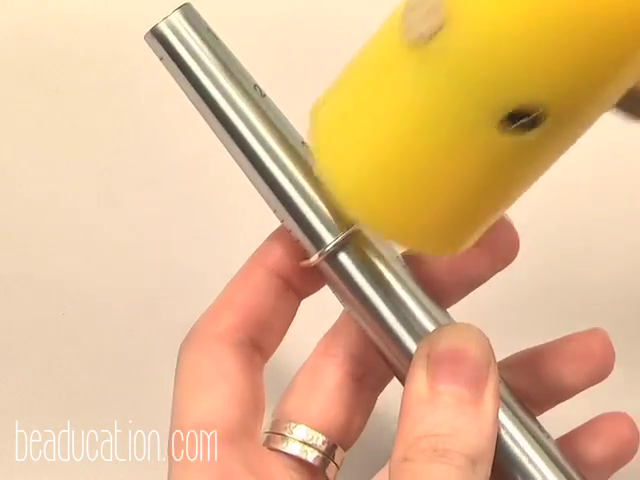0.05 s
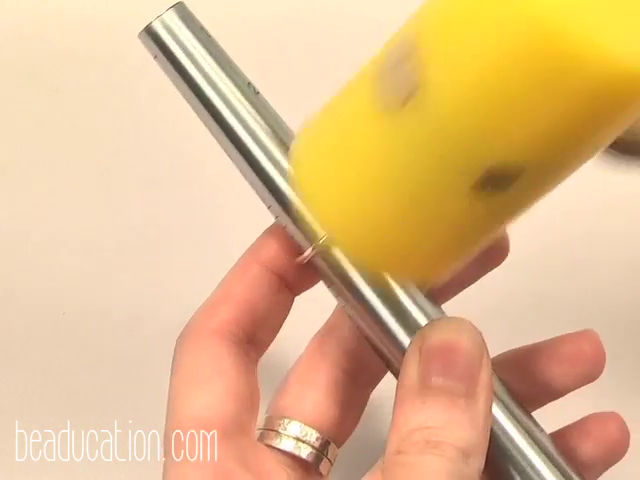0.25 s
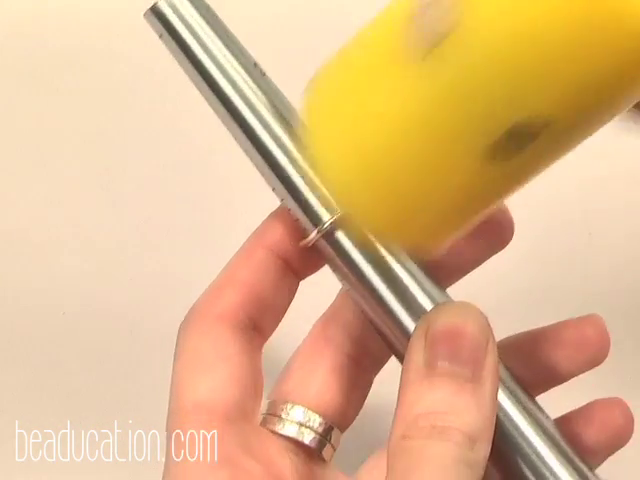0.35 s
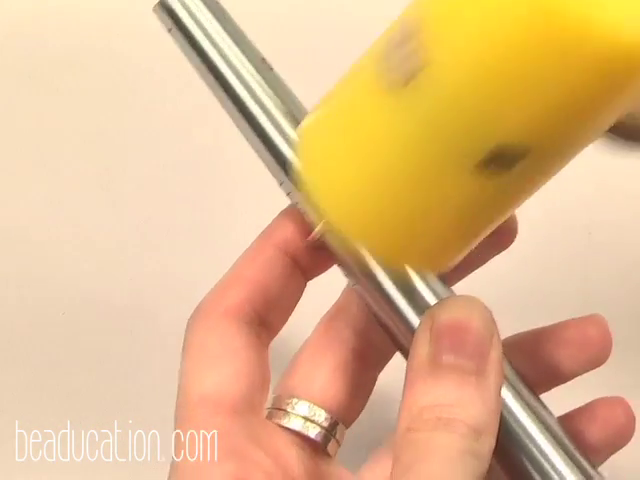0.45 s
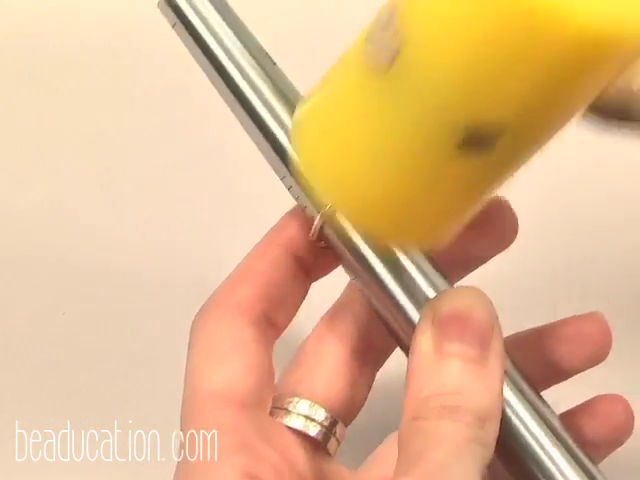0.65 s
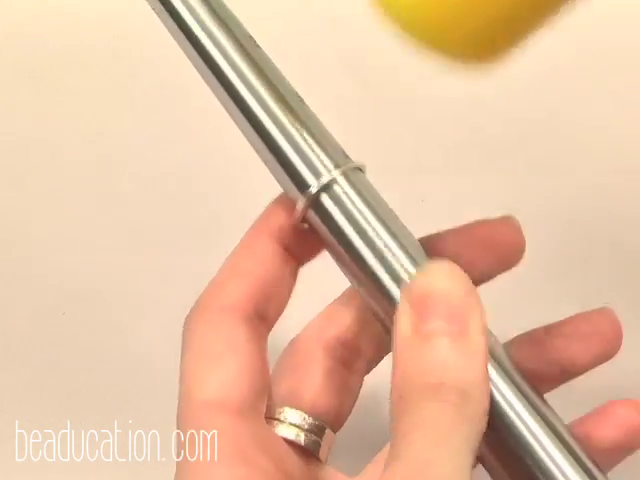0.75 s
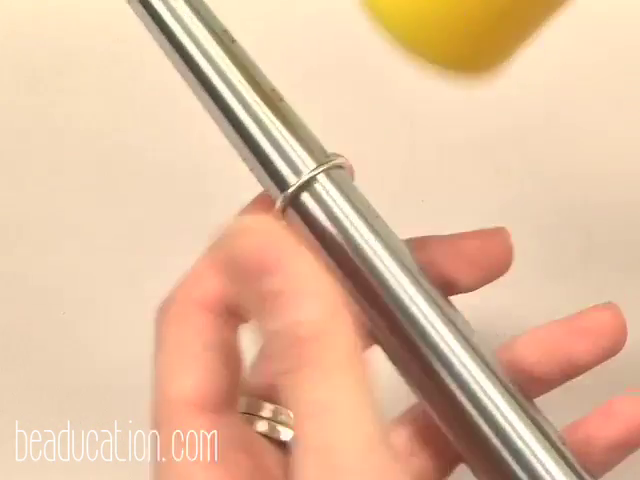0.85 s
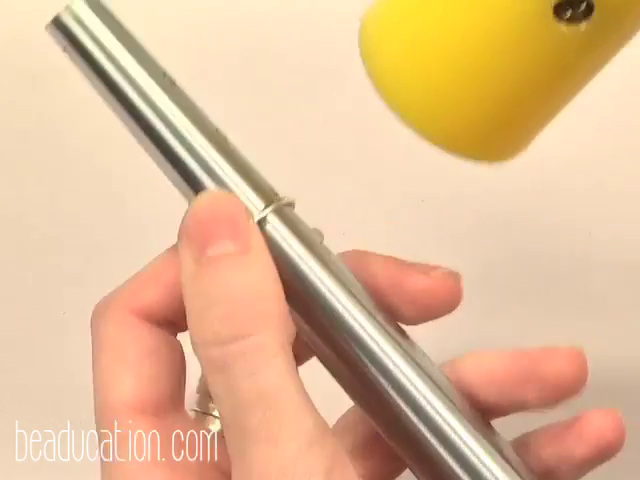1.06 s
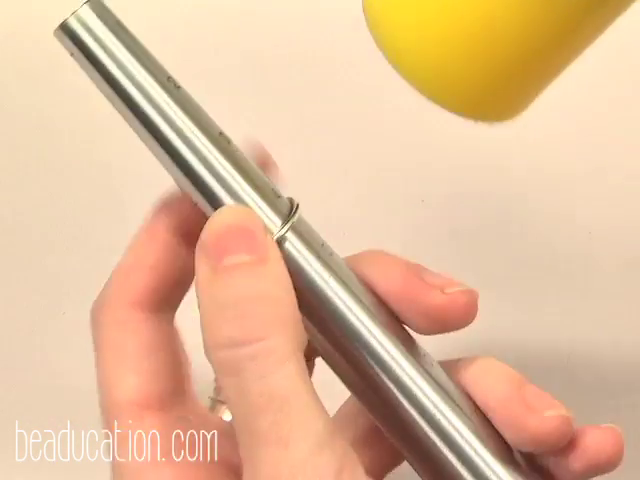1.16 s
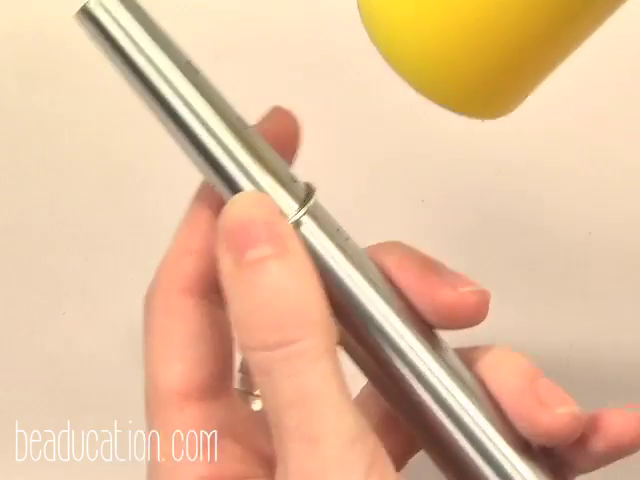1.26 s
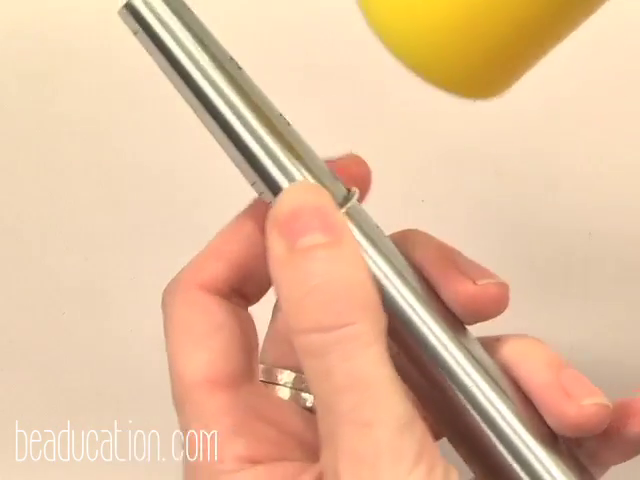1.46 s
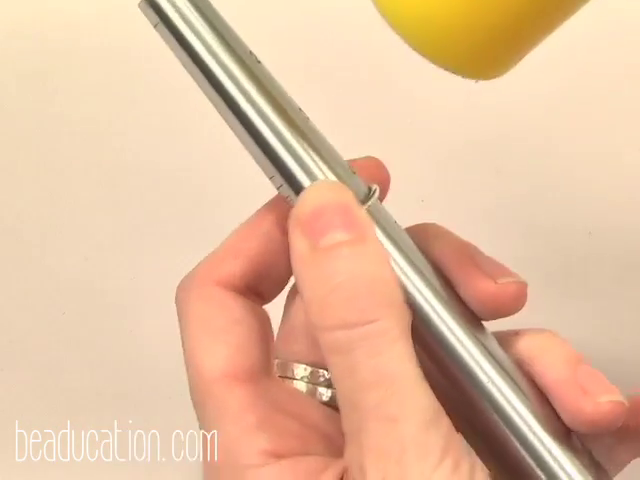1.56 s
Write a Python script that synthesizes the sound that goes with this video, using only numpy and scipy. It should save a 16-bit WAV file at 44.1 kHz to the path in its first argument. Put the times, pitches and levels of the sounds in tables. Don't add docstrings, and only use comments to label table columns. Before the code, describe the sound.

A plastic mallet strikes a metal ring on a hand-held steel bar three times in quick succession, each crack leaving a short bright ring; later a faint tick, over low rumble and hiss, close microphone in a small room.

```python
import sys
import numpy as np
from scipy import signal
from scipy.fft import rfft, irfft, next_fast_len
from scipy.io import wavfile
from scipy.ndimage import uniform_filter1d, map_coordinates

SR = 44100
rng = np.random.default_rng(int(sys.argv[2]) if len(sys.argv) > 2 else 0)


def undo_db(level):
    steps = np.asarray(level, float) / 20
    return 10 ** steps


def output_pcm(signal):
    pcm = np.clip(np.atleast_2d(signal).T, -1, 1) * 32767
    wavfile.write(sys.argv[1], SR, np.round(pcm).astype(np.int16))


N = 70560

# start in seconds, chatter level in dB, contact length in seconds,
# push level in dB, rebound level in dB.
BLOWS = [
    (.21, -3, .0016, -20, -12.5),
    (0.4235, -1.5, 0.001496, -18.5, -12),
    (.614, -3, 0.001238, -3, -3),
    (1.1524, -30, 0.00008, -66.5, -66),
]
# slips per second, fade of the slips in dB per 0.33 ms,
# ring time of the bar against a light grip as a factor, room level in dB.
SKIDS = [(1753, 2, 0.81, -14), (1895, 3, 0.87, -16.5), (3080, 34, 1.27, -17), (4000, 1.1, 1.3, -13.5)]
# pitch in Hz, time to fall 60 dB in seconds.
BAR_MODES = [(985, .27), (2508, 0.12), (4621, 0.14), (7311, 0.065), (10575, 0.084), (14195, 0.12)]
BAR_LEVELS = [(-28, -28, -21.5, -58), (-20.5, -23, -32, -42), (-27, -32.5, -41, -38),
              (-22, -22, -28, -48.5), (-35, -24.5, -29.5, -41), (-51, -34, -40, -62)]
# pitch in Hz, time to fall 60 dB in seconds.
HEAD_MODES = [(1320, 0.025), (1900, 0.0076), (3450, 0.0065), (4180, 0.015), (5130, 0.0082), (5900, 0.014),
              (6900, 0.0083), (11400, 0.0061), (12800, 0.0084)]
HEAD_LEVELS = [(-9, -8.5, -9, -45), (-23.5, -28.5, -23, -64), (-7, -2, -8, -56), (-12.5, -12, -11.5, -56),
               (-17, -12.5, -20, -66), (-16, -29, -16.5, -62), (-7.5, -5, -6.5, -45),
               (-21, -16, -11.5, -35), (-20, -11, -8.5, -45)]
# start in seconds, level in dB, pitch in Hz, time to fall 60 dB in seconds.
TICKS = [(0.0567, -29.5, 296, 0.02), (.061, -36, 756, 0.036), (.15, -33, 1600, 0.0037),
         (0.1685, -15.5, 1650, 0.0029), (0.1742, -36, 3600, 0.0027), (0.2383, -24, 900, 0.0072)]
# frequency in Hz, time to fall 60 dB in seconds.
ROOM_DECAY = [(150, 0.19), (500, 0.4764), (1300, 0.31), (4000, 0.22), (12000, 0.17)]
# frequency in Hz, level in dB.
ROOM_COLOUR = [(100, -6), (500, 2.5), (1400, -1), (3000, -2.5), (6000, -3.5), (9000, -4), (15000, -5.5)]
# frequency in Hz, level in dB per Hz.
RUMBLE_COLOUR = [(8.8, -10), (15, 12), (70, 4), (140, -9), (184, -14.5), (300, -43), (390, -39),
                 (660, -120)]
# frequency in Hz, level in dB per Hz.
HISS_COLOUR = [(120, -7), (200, -2), (979, -12), (1070, -14.5), (1180, -15), (14200, -27.5), (15600, -28),
               (16500, -69)]
DUCK_DB = (3.6, 1.5, 3.5)

LINGER_DB, LINGER_T60_TIMES, LINGER_HZ = -16.5, 1.7, 3.7
BUILD = 2.2
SLIP_SCATTER, SLIP_CUTOFF_HZ = 0.17, 5570
SWELL_S = 0.0004
CHOKE_DB, CHOKE_S = -6.5, 0.00064
PUSH_CUTOFF_HZ, REBOUND_S = 3770, 0.00039
SPRING_HZ, SPRING_WIDTH_HZ, SPRING_DB = 1240, 1500, 0.5
ROOM_LAG_S, BAR_ROOM_DB = 0.004, -4.5
FAR_S = 0.0019
RUSTLE_START_S, RUSTLE_END_S, RUSTLE_DB, RUSTLE_HZ = 0.049, 0.18, -56.5, 900
RUMBLE_DB, HISS_DB = -41.5, -54.5
START_DB, RECOVER_DB_PER_S = 3, 4.5
DIP_DB, DIP_S = 1.5, 0.12
CEILING, TOP_HZ = 0.82, 16100


def taps():
    out = np.zeros(N)
    t = np.arange(SR // 2) / SR
    for blow, skid, shake, reach in zip(BLOWS, SKIDS, np.transpose(HEAD_LEVELS), np.transpose(BAR_LEVELS)):
        start, chatter_db, length, push_db, rebound_db = blow
        rate, fade_db, free, room_db = skid
        struck = undo_db(chatter_db) * slips(length, rate, fade_db, t)
        struck = struck - mallet_head(length, shake, t) + push(length, push_db, rebound_db, t)
        bar = ringing_bar(reach, free, t)
        crack = struck * np.exp(-np.maximum(t - length, 0) / FAR_S)
        answer = undo_db(room_db) * room(crack + undo_db(BAR_ROOM_DB) * bar)
        add(out, start, struck + bar * np.minimum(t / length / BUILD, 1) + answer)
    return out


def slips(length, rate, fade_db, t):
    chance = rng.standard_normal((24, 2))
    k = np.arange(24)
    at = np.abs(k + SLIP_SCATTER * chance[:, 0] * (k > 0)) / rate
    height = -undo_db(0.5 * chance[:, 1] - fade_db * at / 0.00033) * (at <= length)
    clicks = np.bincount((at * SR).astype(int), height, len(t))
    clicks = filtered(clicks, lambda f: 1 / (1 + 1j * f / SLIP_CUTOFF_HZ) ** 3)
    return clicks / np.abs(clicks).max()


def mallet_head(length, shake, t):
    head = sum(ring(hz, db, t60, t) for (hz, t60), db in zip(HEAD_MODES, shake))
    head = head * (1 - np.exp(-t / SWELL_S))
    late = np.maximum(t - length, 0)
    return head * undo_db(CHOKE_DB * (1 - np.exp(-(late / CHOKE_S) ** 2)))


def push(length, push_db, rebound_db, t):
    pressing = -undo_db(push_db) * t / length
    rebound = undo_db(rebound_db) * np.exp(-np.maximum(t - length, 0) / REBOUND_S)

    def spring(f):
        shiver = undo_db(SPRING_DB) * peak(f, SPRING_HZ, SPRING_WIDTH_HZ)
        return 1 / (1 + 1j * f / PUSH_CUTOFF_HZ) ** 2 + shiver

    return filtered(np.where(t < length, pressing, rebound), spring)


def ringing_bar(reach, free, t):
    bar = np.zeros(len(t))
    for (hz, t60), db in zip(BAR_MODES, reach):
        bar += ring(hz, db, t60 * free, t)
        bar += ring(hz + LINGER_HZ, db + LINGER_DB, t60 * free * LINGER_T60_TIMES, t)
    return bar


def room(x):
    hz, t, z = signal.stft(rng.standard_normal(SR // 2), SR, nperseg=256)
    level_db = along(ROOM_COLOUR, hz)[:, None] - 60 * t / along(ROOM_DECAY, hz)[:, None]
    tail = signal.istft(z * undo_db(level_db), SR, nperseg=256)[1]
    tail = np.pad(tail, (round(ROOM_LAG_S * SR), 0))
    return signal.fftconvolve(x, tail / np.linalg.norm(tail))[:len(x)]


def handling():
    t = np.arange(N) / SR
    unevenness = unit(uniform_filter1d(rng.standard_normal(N), size=300))
    grains = rng.standard_normal(N) * undo_db(2 * unevenness)
    out = undo_db(RUSTLE_DB) * unit(filtered(grains, lambda f: peak(f, RUSTLE_HZ, RUSTLE_HZ) ** 2))
    out = out * (t > RUSTLE_START_S) * (t < RUSTLE_END_S)
    for start, db, hz, t60 in TICKS:
        tick = ring(hz, db, t60, t) * np.minimum(t * hz, 1)
        add(out, start, tick[:SR // 10])
    return out


def air():
    swell = map_coordinates(rng.standard_normal(40), [np.arange(N) * 7.71 / SR])
    rumble = undo_db(RUMBLE_DB + 2.7 * swell) * coloured_noise(RUMBLE_COLOUR)
    return rumble + undo_db(HISS_DB) * coloured_noise(HISS_COLOUR)


def coloured_noise(colour):
    return unit(filtered(rng.standard_normal(N), lambda f: undo_db(along(colour, f))))


def ring(hz, db, t60, t):
    return undo_db(db - 60 * t / t60) * np.sin(2 * np.pi * hz * t)


def peak(f, hz, width):
    return 1j * f * width / (hz * hz - f * f + 1j * f * width)


def filtered(x, response):
    m = next_fast_len(len(x) + SR // 2)
    return irfft(rfft(x, m) * response(np.fft.rfftfreq(m, 1 / SR)), m)[:len(x)]


def along(points, hz):
    f, v = np.transpose(points)
    return np.interp(np.log(hz + 1), np.log(f + 1), v)


def unit(x):
    return x / np.sqrt(np.mean(x ** 2) + 1e-20)


def add(track, start, sound):
    piece = track[round(start * SR):][:len(sound)]
    piece += sound[:len(piece)]


def scene():
    return (taps() + handling() + air())[None]


def low_pass(x):
    return signal.sosfilt(signal.butter(12, 16830, fs=SR, output="sos"), x)


def record(dry):
    t = np.arange(N) / SR
    gain_db = START_DB + RECOVER_DB_PER_S * t
    for blow, duck_db in zip(BLOWS, DUCK_DB):
        gain_db = gain_db - duck_db * (t > blow[0] + 0.003)
    since = t - BLOWS[2][0] - 0.003
    dip_db = DIP_DB * (since > 0) * np.exp(-np.abs(since) / DIP_S)
    x = dry[0] * undo_db(gain_db - dip_db)
    x = x / (1 + np.abs(x / CEILING) ** 8) ** (1 / 8)
    x = signal.sosfilt(signal.butter(10, TOP_HZ, fs=SR, output="sos"), x)
    return low_pass(x[None])


dry = scene()
out = record(dry)
output_pcm(out)
```